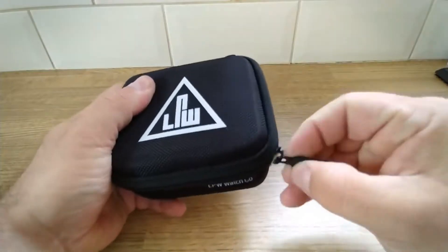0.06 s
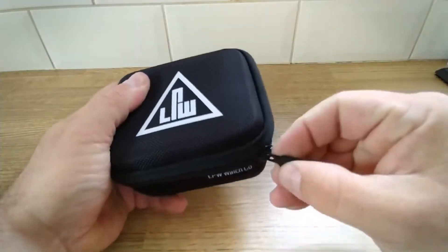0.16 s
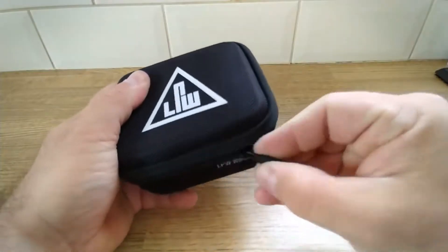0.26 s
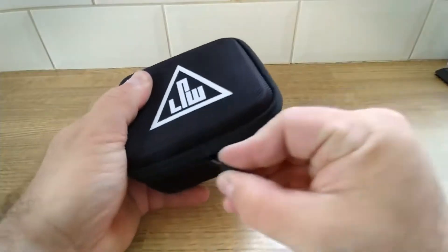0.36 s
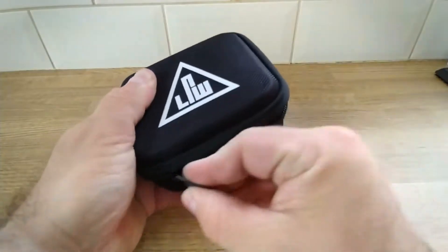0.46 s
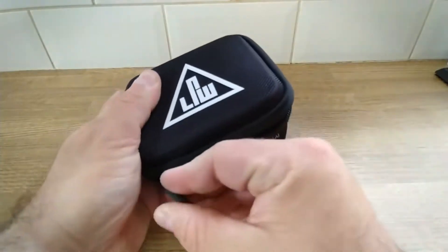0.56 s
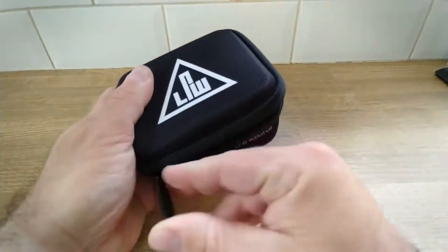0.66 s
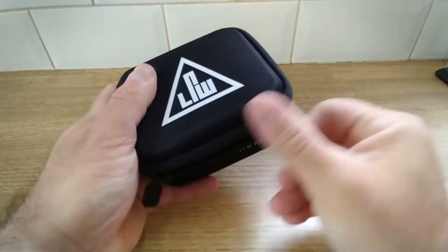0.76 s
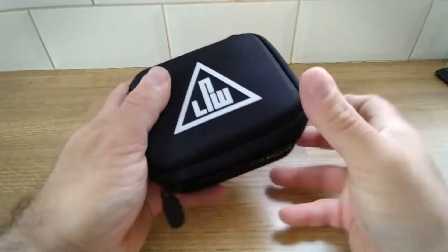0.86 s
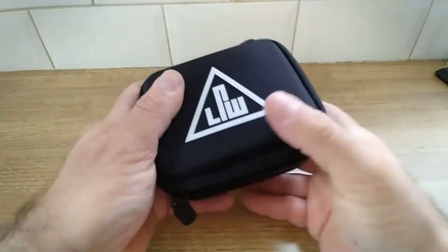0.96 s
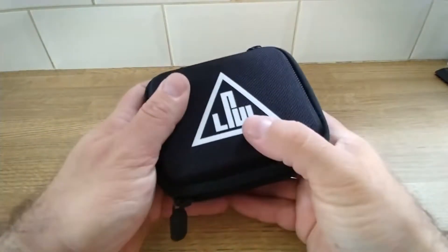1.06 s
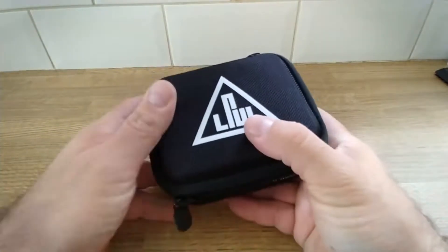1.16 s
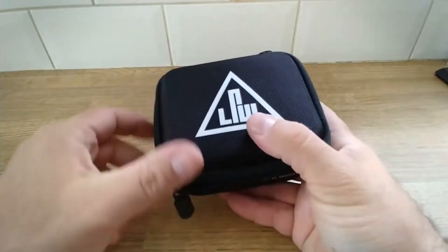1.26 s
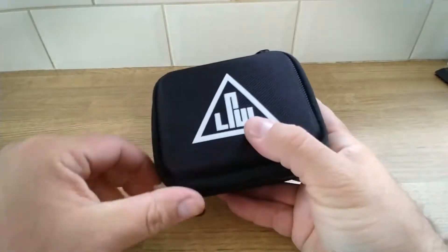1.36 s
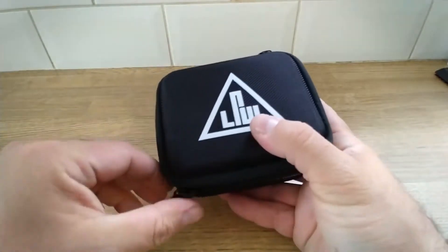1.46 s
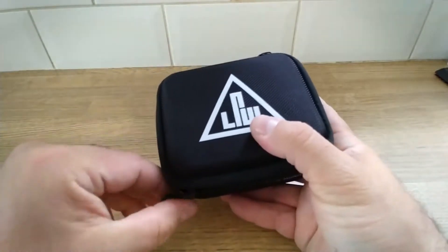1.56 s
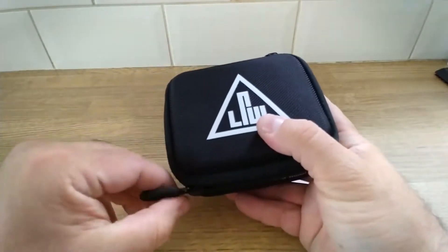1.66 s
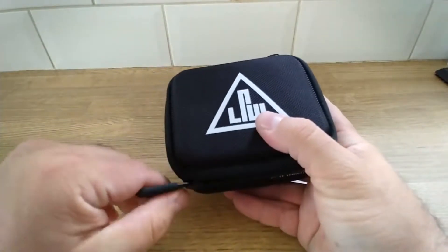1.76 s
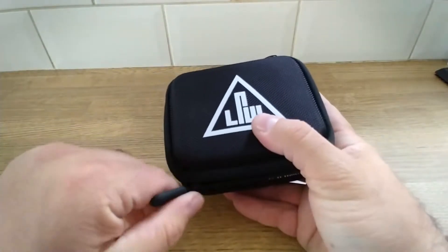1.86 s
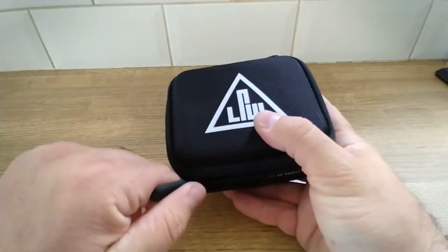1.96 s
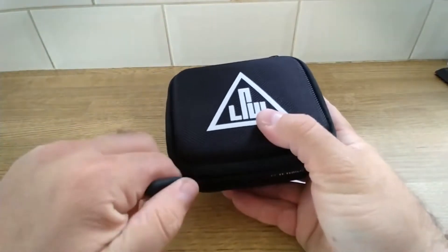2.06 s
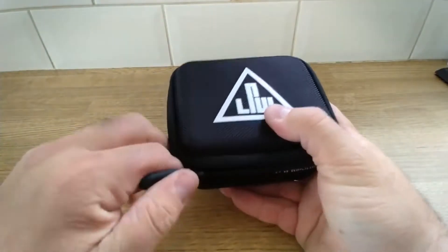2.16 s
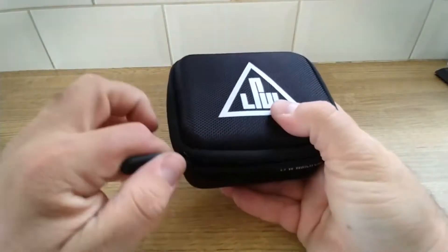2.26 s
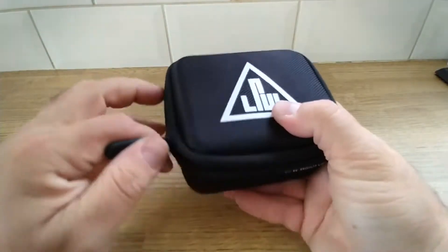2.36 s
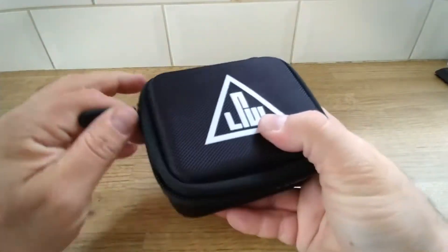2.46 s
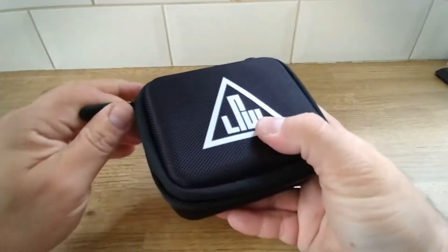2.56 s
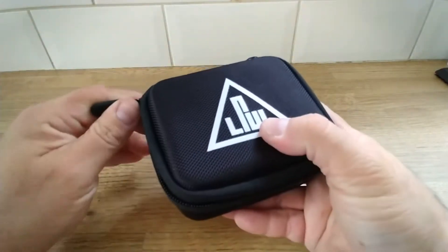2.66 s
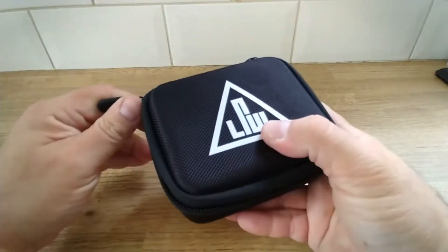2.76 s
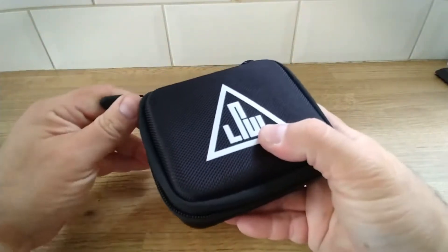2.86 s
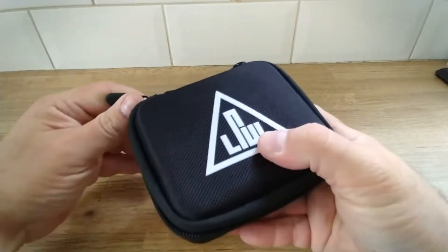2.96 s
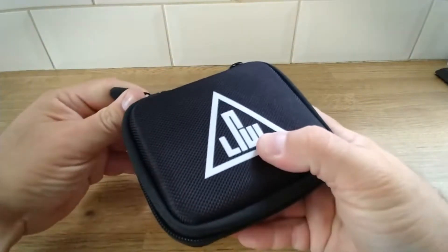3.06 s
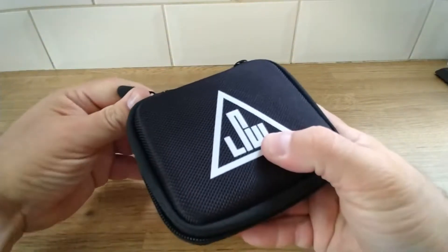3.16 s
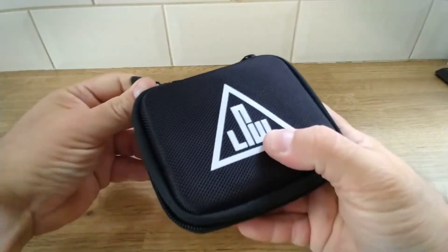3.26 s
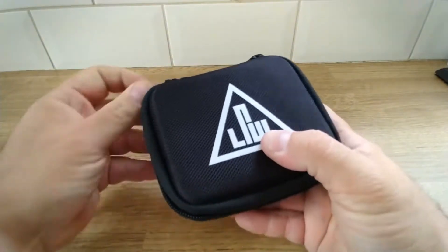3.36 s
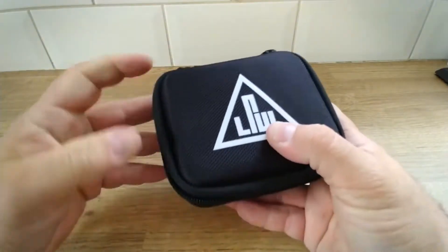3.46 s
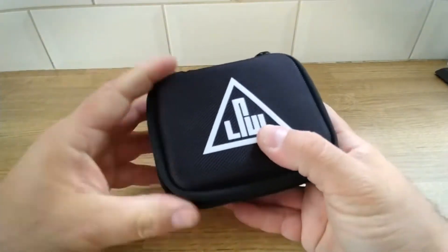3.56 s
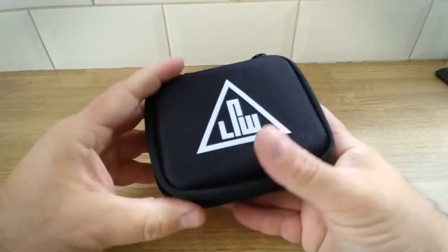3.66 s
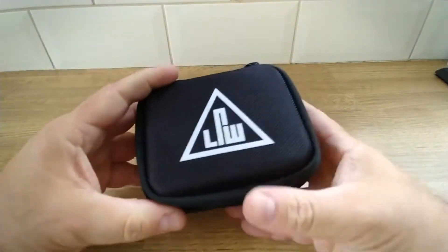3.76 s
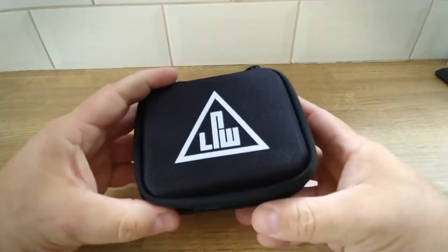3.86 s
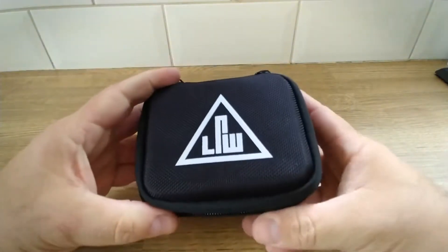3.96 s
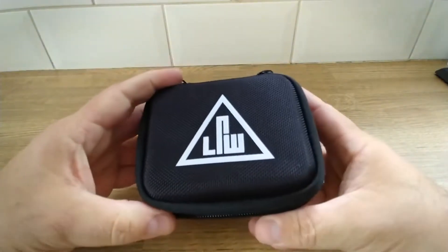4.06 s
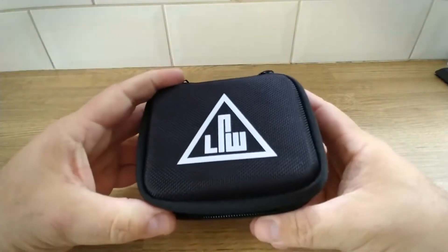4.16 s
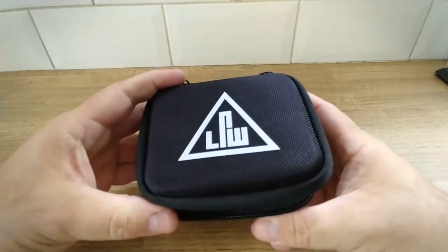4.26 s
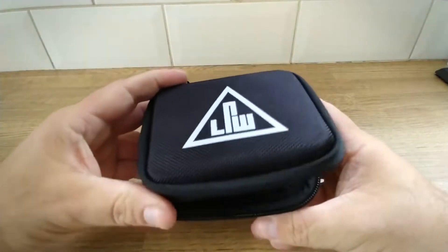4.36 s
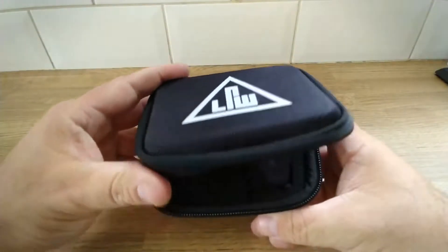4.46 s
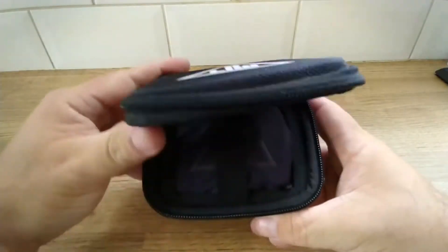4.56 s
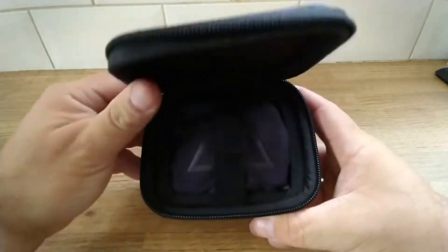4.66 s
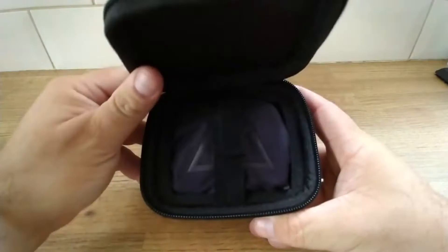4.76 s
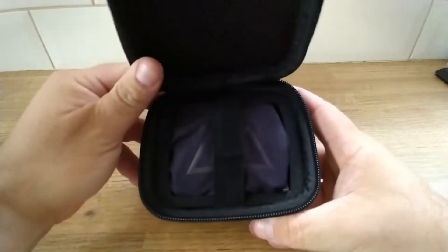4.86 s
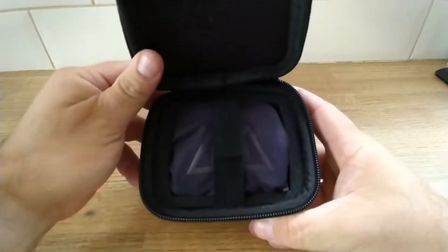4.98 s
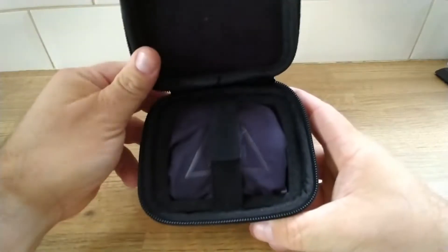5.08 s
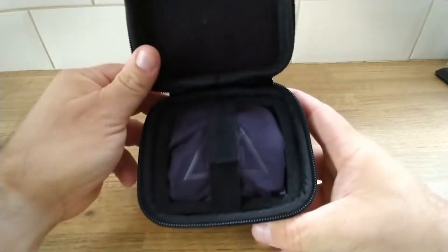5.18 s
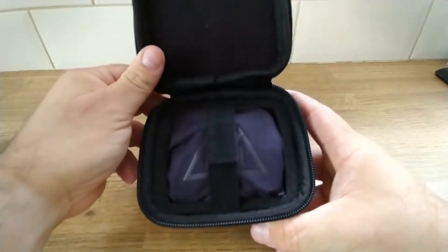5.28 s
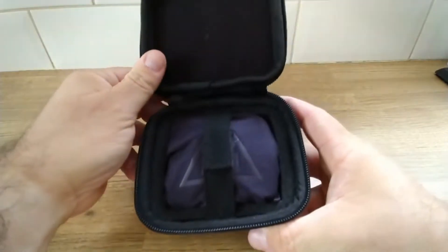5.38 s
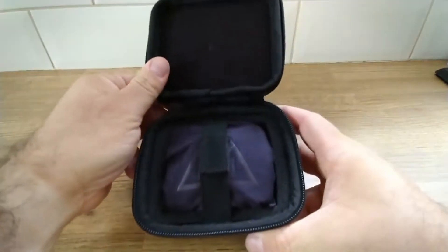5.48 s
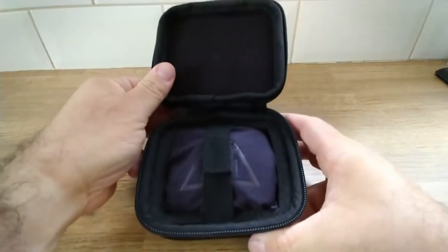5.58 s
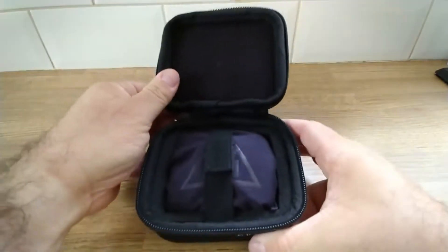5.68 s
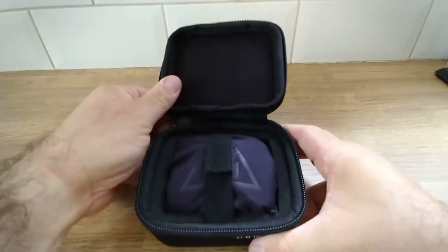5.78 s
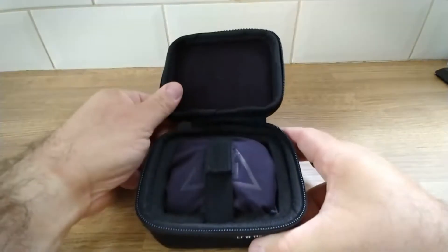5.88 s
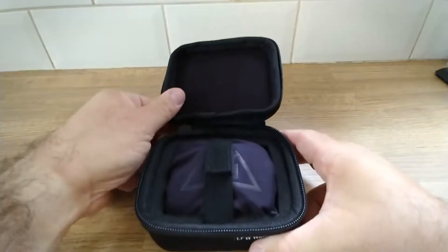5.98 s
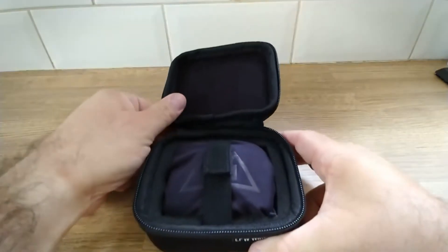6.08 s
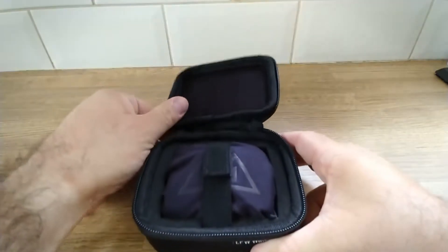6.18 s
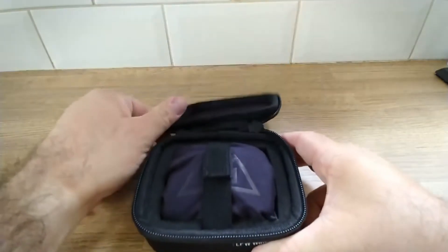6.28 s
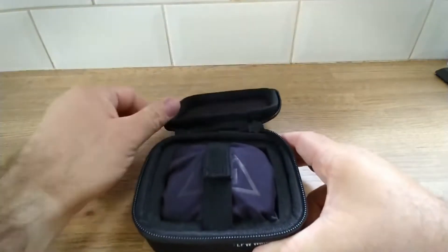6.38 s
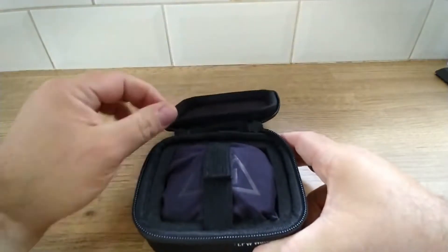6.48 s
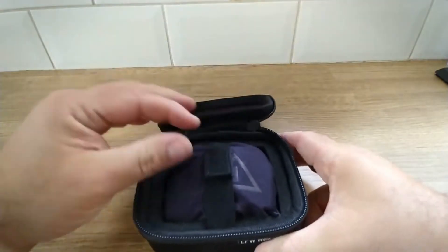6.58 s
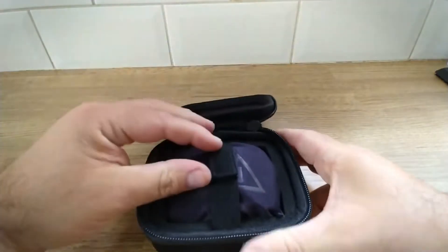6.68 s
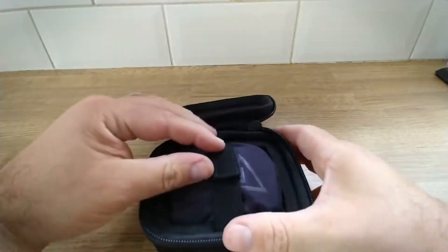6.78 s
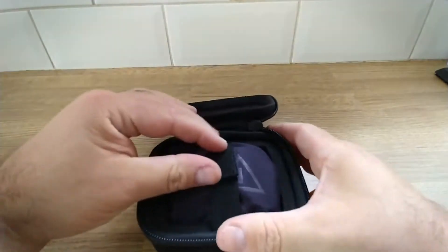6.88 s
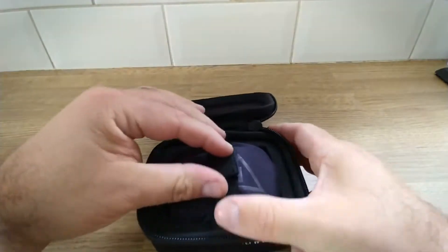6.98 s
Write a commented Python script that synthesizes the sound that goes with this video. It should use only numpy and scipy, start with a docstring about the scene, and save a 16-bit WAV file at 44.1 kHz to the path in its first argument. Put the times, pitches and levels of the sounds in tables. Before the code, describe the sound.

Close, dry handling of a small hard-shell fabric case in a tiled room, with very short reflections and faint room tone. At 0 seconds a tiny zip tick, then from 0.2 to 0.5 a rasping pull swells, its fast teeth giving a hollow mid-pitched buzz. Tab clacks cluster at 0.5 and 0.7, with a bright decaying metallic rattle. A sharp clack at 1.1 leads into scuffs, light taps and skin hiss until 2.2. The second pull, 2.2 to 2.55, speeds up and is brighter. Dull creaks and small catches at 2.6 to 2.8 precede a slower, uneven third pull until 3.0. Knocks and scuffs come around 3.4 and 4.0. The lid lifts near 4.7 with soft low judders. Quiet brushing continues; a rough hinge creak surges at 6.1 to 6.3, ending in a knock. Soft scuffs follow near 6.8 and 7.0.

```python
"""Zip teeth rasp: the first of three pulls that open a small hard-shell fabric case above a wooden table.
Knocks, tab clacks, scuffs, skin hiss and dull creaks surround the pulls; then the lid lifts and its hinge creaks.
Tooth kicks, decaying contact noise and random fibre clicks drive filters for body, shell and surface ticks.
A phone close by hears it in a small tiled room: two coloured ports, short noise echoes, faint room tone."""
import sys
import numpy as np
from scipy import signal
from scipy.fft import rfft, irfft, next_fast_len
from scipy.io import wavfile
from scipy.ndimage import uniform_filter1d

SR = 44100
rng = np.random.default_rng(int(sys.argv[2]) if len(sys.argv) > 2 else 0)


def unload_audio(sound):
    """Save the sound as a 16-bit wav file, at the path given as the first command line argument."""
    columns = np.transpose(np.atleast_2d(sound))
    # keep every value between -1 and 1, then stretch to whole-number steps
    steps = np.round(np.clip(columns, -1, 1) * 32767)
    wavfile.write(sys.argv[1], SR, steps.astype(np.int16))


N = 310023
TIME_S = np.arange(N) / SR

# All levels are relative: the mix, ports and output gain follow.
# Slider pulls: time_s, teeth_per_s, body_db, shell_db, tick_db, body_hz, shell_hz
PULL_FRONT = [(0, 244, -30, -35.5, -55, 520, 1500), (.035, 159, -48, -48, -74, 560, 1600),
              (.075, 66, -53.5, -54.5, -82, 600, 1500), (.2, 50.3, -51, -55, -90, 560, 1500),
              (.215, 103.5, -46.5, -53, -85, 560, 1450), (.24, 118, -37, -42.5, -74.5, 530, 1700),
              (.29, 181, -31, -39, -72, 700, 1650), (.315, 183, -33, -44, -70.5, 600, 1850),
              (.337, 174, -24, -39.5, -69, 520, 1900), (.387, 180, -20.5, -33, -61.5, 520, 1900),
              (.41, 190, -29, -37, -56, 480, 1550), (.43, 128.6, -32, -42.5, -58.5, 298, 1700),
              (.465, 167, -32.5, -41, -62, 560, 1600), (.485, 118, -36, -42, -65.5, 560, 1700),
              (.51, 132, -32.5, -39, -61.5, 520, 2100)]
PULL_SIDE = [(2.185, 69.3, -78, -66, -55.5, 650, 1890), (2.205, 84.4, -38.5, -46, -61, 650, 1980),
             (2.25, 79.8, -39.5, -46, -70.5, 760, 2300), (2.29, 56.73, -43, -44.5, -56, 600, 2310),
             (2.325, 81.4, -40.5, -37.5, -44, 600, 2290), (2.347, 233.9, -37, -38.5, -41, 563, 2250),
             (2.37, 284.6, -27.5, -36, -39, 565, 1950), (2.398, 294.5, -30.5, -31, -47, 600, 1400),
             (2.424, 321.8, -32.5, -33, -40, 334, 1500), (2.46, 271.1, -31, -31.5, -33.5, 267, 2030),
             (2.482, 246.9, -33.5, -40, -47, 676, 1800), (2.51, 229.3, -44.5, -48, -68, 286, 1460),
             (2.54, 212, -41.5, -47.5, -73, 260, 990)]
PULL_CORNER = [(2.88, 30.3, -56, -58, -91, 650, 1400), (2.908, 99.56, -42, -42, -58, 680, 1420),
               (2.945, 112.1, -34.5, -45, -64, 504, 1470), (2.985, 91, -37, -45, -69.5, 490, 1780),
               (3.015, 57, -49, -53.5, -70, 410, 1410)]
# Short knocks and clicks of fingers, tab, slider and lid: start_s, level_db, thump_db, click_db
# (thump_db and click_db relative to level_db)
KNOCKS = [(.065, -63, -8, -2), (.1212, -54, 6.5, -13.5), (.3858, -41.5, 16.5, -14.5), (.4115, -41, 9, -20),
          (.891, -62, -3, -12), (1.187, -55, -8, -21), (1.2797, -49.5, -5, -25), (1.3037, -48.5, 5.5, -28),
          (1.332, -56.5, 2.5, -22), (1.355, -59, 7, -24), (1.387, -64, 12, -20), (1.413, -54.5, 2, -16),
          (1.472, -48.5, 1.5, -6), (1.518, -56, 0, -15), (1.56, -60.5, -1, -14), (1.587, -53, 4, -12),
          (1.7166, -48.5, -1, -25.5), (1.8336, -43.5, -2, -10.5), (1.9586, -52.5, 5.5, -3),
          (1.9964, -51, 2, -3.5), (2.0339, -48.5, -1.5, -4.5), (2.0511, -58, 2, -25),
          (2.1759, -50, 3.5, -20), (2.1953, -42, 4, -13), (2.2008, -42.5, 3.5, -19),
          (2.4992, -46.5, 12.5, -13), (2.8668, -50.5, 3.5, -20), (2.9029, -35.5, -5, -26),
          (3.0517, -61.5, 15.5, -18.5), (3.194, -65, 6.5, -5.5), (3.306, -67.5, 12, -27),
          (3.3552, -42.5, 4.5, -9.5), (3.3865, -51, 19.5, -21), (3.4048, -44.5, 7, -15),
          (3.465, -53, -4, -17), (3.489, -56, -9, -24), (3.529, -55.5, 13, -29), (3.587, -52, 6, -16),
          (3.655, -71.5, 14, -12), (3.699, -65, 7, 3.5), (3.738, -60.5, -4, -19), (3.962, -57, 1, -17),
          (3.992, -52, 0, -16), (4.013, -48, 4.5, -22), (4.0195, -42, -1, -14), (4.185, -67.5, 8, -18),
          (4.205, -61.5, 3.5, -14), (4.257, -67.5, 8, -22), (4.28, -61, -6.5, -24.5), (4.306, -57, -7, -16),
          (4.324, -62.5, 5, -22), (4.4004, -58, -1, -9), (4.415, -54.5, -4, -21), (4.6089, -62, 12, -12),
          (4.795, -63.5, 2, -26), (4.811, -61.5, 5, -18), (5.125, -77.5, 8, -1.5),
          (5.179, -68.5, 0.5, -23.5), (5.373, -64.5, 0.5, 8.5), (6.01, -52, -15, -5.5),
          (6.3035, -38, -7, -21.5), (6.3105, -45.5, -21.5, -17.5), (6.7929, -48.5, -6.5, -33),
          (6.9789, -40.5, -6, -36)]
# Metal pull tab clacking on the slider: start_s, level_db, thump_db, click_db (as above)
CLACKS = [(.5134, -40.5, 6, -13.5), (.5261, -37.5, 0.5, -10.5), (.5478, -40, 3, -8.5),
          (.6924, -50, 1.5, -19), (.7119, -37.5, -4.5, -8), (.7237, -35, -5, -9.5),
          (.7347, -31.5, -4.5, -13.5), (.7378, -30.5, -7.5, -23), (.755, -45, 5.5, -21.5),
          (.833, -49.5, 1, -34), (1.0548, -54, 8, -5), (1.0969, -33.5, -10, -18)]
# Slider catching and giving way near the last corner: start_s, level_db, thump_db, click_db (as above)
CATCHES = [(2.609, -52.5, 9.5, -34), (2.622, -52, 6.5, -29), (2.648, -52, 7.5, -29), (2.694, -58, 11, -8),
           (2.71, -47, 6, -20), (2.74, -52.5, 7.5, -17), (2.773, -50.5, 5, -21), (2.799, -48, 0, -19),
           (2.821, -49, 2.5, -29)]
# Fingers and lid scuffing fabric: peak_s, length_s, level_db, thump_db, hiss_db, body_hz
# (thump_db and hiss_db relative to level_db)
SCUFFS = [(0.571, 0.072, -48.5, -2.5, -25.5, 395), (0.734, 0.059, -40, -3, -26, 653),
          (1.001, 0.037, -56, 2, -3.5, 640), (1.124, 0.08, -50, -4.5, -21, 825),
          (1.298, 0.25, -56, -14, -7, 750), (1.457, 0.12, -58.5, 1, -6.5, 517),
          (1.586, 0.054, -60, 9.5, 0.5, 530), (1.862, 0.03, -47.5, 0.5, -35, 760),
          (1.973, 0.037, -58, 7, -26, 565), (2.201, 0.054, -46.5, 3.5, -2.5, 655),
          (2.569, 0.34, -55.5, 3.5, -32, 320), (3.367, 0.064, -52, 11.5, -23, 585),
          (3.398, 0.099, -45.5, 7.5, -19.5, 290), (3.561, 0.081, -49.5, 4, -17, 505),
          (3.659, 0.15, -67.5, 11.5, 2.5, 493), (3.755, 0.057, -59, -8, -10, 750),
          (3.88, 0.042, -58, 1, -11.5, 640), (3.996, 0.084, -46.5, 2, -19.5, 723),
          (4.016, 0.024, -43.5, 8.5, -14, 747), (4.305, 0.11, -61, 7, -16, 752),
          (4.404, 0.02, -59, 9, -8, 750), (4.547, 0.076, -61, -1, -3.5, 496),
          (4.644, 0.17, -78, 9, -21, 530), (4.802, 0.078, -59, 1.5, -18, 404),
          (5.194, 0.049, -71, -6, -28, 402), (5.4, 0.089, -72.5, 4.5, 2, 550),
          (5.613, 0.057, -69, 2.5, -6, 616), (5.833, 0.039, -61.5, -19, -15, 600),
          (6.333, 0.054, -50, -3, -30, 391), (6.808, 0.059, -48.5, -10.5, -21, 820),
          (6.889, 0.06, -57, -8, -16, 400), (6.979, 0.023, -46.5, 3.5, -19, 820)]
# Skin sliding lightly over the weave: time_s, mids_db, treble_db
BRUSH = [(0, -60, -81), (.88, -61, -70.5), (1.25, -56, -68), (1.419, -63.5, -89), (2.1, -68, -81.5),
         (2.62, -53.5, -69.5), (3.251, -70.5, -84), (3.72, -64.5, -71), (3.821, -67.5, -76),
         (4.851, -68, -78.5), (5.031, -84, -104), (5.381, -64, -75.5), (5.6, -60, -73),
         (5.67, -66.5, -79.5), (5.902, -64, -81.5), (6.199, -57.5, -73), (6.285, -70.5, -81),
         (6.428, -67, -81.5), (6.56, -61.5, -73.5), (7.02, -65.5, -78)]
# Dull creaks of the flexing case: peak_s, length_s, level_db, resonance_hz
FLEXES = [(0.368, 0.03, -55.5, 90), (1.202, 0.7, -61, 130), (2.235, 0.14, -50.5, 122),
          (2.608, 0.13, -44.5, 136), (2.759, 0.18, -51, 141), (2.898, 0.052, -39, 140),
          (2.962, 0.2, -43.5, 105), (3.388, 0.24, -56, 168), (4.848, 0.13, -58.5, 138.5),
          (4.97, 0.34, -73, 121), (5.203, 0.1, -61.5, 125), (5.275, .06, -68.5, 120),
          (5.575, .025, -59, 124.5), (5.617, .06, -69, 125.4), (5.699, 0.053, -70, 125),
          (6.325, 0.069, -53, 155), (6.469, 0.052, -62.5, 119.8), (6.832, 0.054, -53.5, 157),
          (6.894, 0.16, -52.5, 160)]
# Lid juddering on its stiff spine: start_s, length_s, level_db
JUDDERS = [(4.748, .012, -54.5), (4.775, .03, -48.5), (4.81, .012, -42.5), (4.96, .02, -64),
           (5.135, .012, -64), (5.177, .012, -54)]
# Hinge creak while the lid folds back: time_s, level_db
HINGE = [(6.06, -76), (6.125, -59), (6.175, -53), (6.215, -45), (6.236, -50), (6.249, -43.5), (6.264, -46),
         (6.277, -75)]
# Shell resonance, mostly sinking as the case slackens: time_s, resonance_hz
SLACKENING = [(.8, 2050), (2.1, 2120), (2.7, 1525), (4.5, 1520), (6.3, 1245)]

# Body radiation by wall and when tapped: freq_hz, gain_db
BODY_FRONT = [(50, -54.5), (120, -30.5), (200, -21), (290, -2), (430, -9), (525, 3), (620, -8), (710, 1.5),
              (900, -11.5), (1200, -22.5), (2000, -67.5)]
BODY_SIDE = [(110, -28.5), (200, 9.5), (290, 2), (420, -1.5), (560, 3), (720, 7), (900, 6.5), (1100, -54),
             (2000, -43.5)]
BODY_CORNER = [(50, -52.5), (110, -28), (190, -7), (280, 7.5), (360, 3), (500, 5), (620, 5.5), (750, 4),
               (950, -10), (1200, -42.5), (2000, -48.5)]
BODY_TAPPED = [(110, -45.5), (230, -9.5), (400, -8.5), (550, 4), (650, 2.5), (760, 5.5), (950, -11.5),
               (1200, -35.5), (2000, -56)]
# Shell radiation when scuffed, knocked, and under the slider (front, further round): freq_hz, gain_db
SHELL_SCUFFED = [(600, -19.5), (950, 3.5), (1100, -4.5), (1380, 2.5), (1650, -8.5), (1920, 0), (2250, -2.5),
                 (2500, -5), (2900, -9), (3300, -31.5), (4000, -23), (6000, -77.5)]
SHELL_KNOCKED = [(600, -23), (950, 3), (1100, -2.5), (1380, 9), (1650, -6), (1920, 2.5), (2250, -10.5),
                 (2500, -5.5), (2900, -10.5), (3300, -24), (4000, -23), (6000, -42.5)]
SHELL_FRONT = [(600, -11.5), (950, 6.5), (1150, 0.5), (1400, 3), (1700, -2.5), (1950, 0.5), (2300, -8),
               (2600, -12), (2900, -14), (3300, -29.5), (4000, -30), (6000, -56.5)]
SHELL_SIDE = [(600, -14), (950, 4), (1150, -3.5), (1400, 4), (1650, -5), (1950, 1), (2300, -3.5),
              (2600, -5), (2950, -9.5), (3350, -26.5), (4000, -21), (6000, -60.5)]
# Bright surface tick of a contact, and of a tooth: freq_hz, gain_db
TICK = [(2200, -11), (3500, -2.5), (4100, -3), (4600, -7), (5300, -1), (5750, -6.5), (6500, 3), (7400, -5),
        (8600, 2), (9200, 2), (10000, 0.5), (12500, -11.5), (15500, -18.5)]
TOOTH_TICK = [(2200, -14), (3500, -6), (4100, -2), (4600, -7), (5300, -3.5), (5750, -8), (6500, 4.5),
              (7400, -2), (8600, 1.5), (9200, 0.5), (10200, 2), (12500, -11.5), (15500, -18.5)]
# Weave and lid spine under light rubbing: freq_hz, gain_db
WEAVE = [(400, -29), (850, -12.5), (1080, -6), (1320, 2.5), (1620, -5.5), (1860, 3.5), (2200, -3),
         (2900, -3.5), (3350, -11), (4500, -10), (6500, -52)]
# Flexing foam shell: freq_hz, gain_db
FLEX = [(30, -50), (60, -8), (90, -2), (135, -2), (190, -7.5), (260, -3.5), (360, -5.5), (600, -47)]
# Tab and slider ringing in a clack: freq_hz, gain_db
CLACK = [(600, -24.5), (900, -1.5), (1100, 0), (1300, -2.5), (1560, 4.5), (1800, -1.5), (2080, 1.5),
         (2500, -3.5), (2900, -7.5), (3250, -23), (3500, -11), (4100, -19), (4600, -21.5), (6000, -37.5)]
# Released tab ringing: freq_hz, gain_db
TAB = [(900, -16.5), (1400, -10), (1700, 3), (1880, 1), (2100, -0.5), (2350, -5), (2650, -8.5),
       (3400, -18.5), (6000, -38), (10000, -49.5)]
# Hollow boom of the lid: freq_hz, gain_db
LID = [(30, -42.5), (70, -7), (100, -2), (122, -0.5), (155, -1.5), (220, -10), (350, -12), (440, -20),
       (540, -30), (700, -33), (1200, -39), (2500, -70)]
# Creaking spine: freq_hz, gain_db
SPINE = [(500, -45), (950, -27), (1130, -16), (1230, -4), (1320, 3), (1420, -5), (1520, -14), (1650, -26),
         (1850, -13), (1970, -14), (2150, -28), (2550, -24), (3300, -42), (6000, -60)]
# Room tone colour: freq_hz, density_db_per_hz
AIR = [(18, -67.5), (30, -12.5), (147, -1), (216, -4), (524, -7.5), (754, -15.5), (1650, -17.5),
       (3230, -24), (9390, -26.5), (12200, -38.5), (15000, -62)]
# Colour returned by table and tiles: freq_hz, gain_db
ECHO_COLOUR = [(100, -9), (500, -8), (1200, 0), (2200, 1), (4000, 0), (9000, 0), (15000, -3)]
# Phone ports: freq_hz, left_minus_right_db, left_lead_rad, left_direct_share
PORTS = [(60, -3, 0, 1), (130, -1.3, 0, 1), (260, -2.8, .1, 1), (520, -4.3, .3, 1), (800, -6.5, .55, .9),
         (1300, -13.5, -1.8, .45), (2400, -11.5, -1.6, .4), (4400, -2.5, -1.2, .35), (8100, 1, -1.5, .3),
         (14000, 6.5, -1.3, .25)]

# Zip: next tooth caps chatter and tick at these shares of a tooth period
CHATTER_SHARE, TICK_SHARE = .42, .22
TOOTH_TICK_S, STOP_S = .0022, .014  # decay constants
RATTLE, CORNER_RATTLE = .25, .75  # chatter gain in the body's push
BODY_TRAVEL_DB, BODY_TRAVEL_WIDTH_HZ = 4, 160
SHELL_TRAVEL_DB, SHELL_TRAVEL_WIDTH_HZ = 2, 220
# Contact decay constants: body, shell, surface
KNOCK_DECAYS_S = (.0026, .0036, .0024)
CATCH_DECAYS_S = (.0035, .004, .003)
FIRST_PUSH = 4  # against unit-spread noise before crumble gain
PLACE_SPREAD = .04  # log-frequency spread of the struck shell resonance
LIFT_START_S, LIFT_END_S = 4.6, 4.8
WANDER_HZ, WANDER_SPREAD, WANDER_PER_S = 1450, .2, 30  # resonance under a sliding finger
TAB_S, TAB_DB, TAB_T60_S = .738, -37, .41
JUDDER_PER_S = 113
AIR_DB = -73
EARLY_DB, TAIL_DB = -4.5, -15  # echo energy relative to direct
EARLY_DECAY_S = .0018
TOP_HZ = 15400


def amp(db):
    """Decibels to gain."""
    return 10 ** (np.asarray(db) / 20)


def over_hz(hz, values, size):
    """Points joined on a log-frequency axis, read at transform bins."""
    bins_hz = np.arange(size // 2 + 1) * SR / size
    return np.interp(np.log(bins_hz + 1), np.log(hz), values)


def ring(x, spectrum, size=4096):
    """Causal minimum-phase resonator of the given spectrum, unit energy."""
    hz, db = np.transpose(spectrum)
    cepstrum = irfft(np.log(amp(over_hz(hz, db, size))))
    cepstrum[1:size // 2] *= 2
    cepstrum[size // 2 + 1:] = 0
    response = irfft(np.exp(rfft(cepstrum)))[:size // 2]
    return signal.fftconvolve(x, response / np.linalg.norm(response))[:len(x)]


def steady(x, span_s=0.034):
    """Bring running power to one; fine grain stays."""
    size = int(span_s * SR)
    power = uniform_filter1d(uniform_filter1d(x * x, size), size)
    return x / np.sqrt(np.abs(power) + 1e-12)


def add(track, start_s, x):
    """Mix a sound in at a given time."""
    i = max(0, int(start_s * SR))
    track[i:i + len(x)] += x[:max(0, N - i)]


def grains(size, per_s, spread_db, hiss):
    """Fibres catching and letting go: random tiny clicks over fine hiss."""
    sizes = amp(spread_db * np.minimum(rng.exponential(size=size), 4))
    sizes = sizes * rng.choice([-1, 1], size)
    clicks = sizes * (rng.random(size) < per_s / SR)
    return clicks / (clicks.std() + 1e-9) + hiss * rng.standard_normal(size)


def swell(t, length_s, rise, edge_db):
    """Stroke peaking at t = 0; edge_db down at both ends of length_s, rise is the share before the peak."""
    distance = np.maximum(-t / rise, t / (1 - rise)) / length_s
    return amp(-edge_db * distance ** 1.52)


def favour(spectrum, centre_hz, boost_db=7, width=0.17):
    """Contact place lifts one resonance; width is in log frequency."""
    hz, db = np.transpose(spectrum)
    grid = np.linspace(np.log(hz[0]), np.log(hz[-1]), 120)
    bump = np.exp(-.5 * ((grid - np.log(centre_hz)) / width) ** 2)
    return np.column_stack([np.exp(grid), np.interp(grid, np.log(hz), db) + boost_db * bump])


def flutter(per_s):
    """Random levels gliding into one another; spread near one."""
    knots = rng.standard_normal(1024)
    return np.interp(TIME_S * per_s, np.arange(len(knots)), knots)


def shell_pitch(s):
    """Shell resonance in Hz at a moment, as the case slackens."""
    return np.interp(s, *np.transpose(SLACKENING))


def sweep(x, hz, width_hz):
    """Resonance with a movable centre; gain near one at the centre."""
    turn = np.exp(2j * np.pi * np.cumsum(hz) / SR)
    pole = np.exp(-np.pi * width_hz / SR)
    return 2 * (signal.lfilter([1 - pole], [1, -pole], x / turn) * turn).real


def zipper(pull, bodies, shell_spectrum, turn_s, jitter, rough_db, rattle, scrape, chatter_s, drag, first_tooth):
    """Slider wedges teeth apart; each release kicks the case and chatters until the next."""
    s, rate, body_db, shell_db, tick_db, body_hz, shell_hz = np.transpose(pull)
    t = np.arange(s[0], s[-1] + 0.021, 1 / SR)
    speed = np.interp(t, s, rate)
    travel = np.cumsum(speed) / SR
    teeth = np.arange(first_tooth, np.interp(s[-1], t, travel), 1)
    chance = rng.standard_normal((len(teeth), 3))
    at = np.interp(teeth + jitter * chance[:, 0], travel, np.arange(len(t))).astype(int)
    kicks, sharp = np.zeros((2, len(t)))
    kicks[at] = amp(rough_db * chance[:, 1])
    sharp[at] = kicks[at] * amp(2 * chance[:, 2])  # some teeth snap harder

    last = np.maximum.accumulate(np.arange(len(t)) * (kicks > 0))
    since_s = t - t[last]

    def chatter(source, decay_s):
        """Noise decaying after each tooth, over constant tape drag."""
        envelope = source[last] * np.exp(-since_s / decay_s) + drag
        return envelope * rng.standard_normal(len(t)) / np.sqrt(decay_s * SR / 2)

    case_s = np.minimum(chatter_s, CHATTER_SHARE / speed)
    tick_s = np.minimum(TOOTH_TICK_S, TICK_SHARE / speed)
    # Body colour crossfades as the slider reaches the next wall.
    turned = np.clip((t - turn_s) / 0.057 + .5, 0, 1)
    push = kicks + np.interp(turned, (0, 1), rattle) * chatter(kicks, case_s)
    body = ring(push * (1 - turned), bodies[0]) + ring(push * turned, bodies[1])
    shell = ring(kicks + scrape * chatter(kicks, case_s), shell_spectrum)
    tick = ring(0.2 * sharp + chatter(sharp, tick_s), TOOTH_TICK)
    # Place along the track moves one resonance each of body and shell.
    body = body + amp(BODY_TRAVEL_DB) * sweep(body, np.interp(t, s, body_hz), BODY_TRAVEL_WIDTH_HZ)
    shell = shell + amp(SHELL_TRAVEL_DB) * sweep(shell, np.interp(t, s, shell_hz), SHELL_TRAVEL_WIDTH_HZ)
    voices = zip((body, shell, tick), (body_db, shell_db, tick_db))
    mix = sum(steady(voice, 0.011) * amp(np.interp(t, s, db)) for voice, db in voices)
    out = np.zeros(N)
    add(out, s[0], mix * np.exp(-np.maximum(t - s[-1], 0) / STOP_S))
    return out


def brush(shut_db=-5, open_db=-15, shell_db=-3.0, tick_db=-1):
    """Skin slides lightly: fine dry hiss; the hollow body answers less once the lid lifts."""
    s, mids_db, treble_db = np.transpose(BRUSH)
    force = grains(N, per_s=500, spread_db=2.2, hiss=.7)
    hollow_db = np.interp(TIME_S, [LIFT_START_S, LIFT_END_S], [shut_db, open_db])
    weave = ring(force, WEAVE)
    wander_hz = WANDER_HZ * np.exp(WANDER_SPREAD * flutter(WANDER_PER_S))
    weave = weave + sweep(weave, wander_hz, width_hz=320)
    case = amp(shell_db) * steady(weave) + amp(hollow_db) * steady(ring(force, BODY_TAPPED))
    mids = case * amp(np.interp(TIME_S, s, mids_db))
    treble = steady(ring(force, TICK)) * amp(np.interp(TIME_S, s, treble_db) + tick_db)
    pressure = amp(2.06 * flutter(per_s=130))  # uneven finger pressure
    return pressure * (mids + treble)


def air():
    """Faint room tone: noise shared by both ports, and noise each hears alone."""
    shared, left, right = (amp(AIR_DB) * ring(rng.standard_normal(N), AIR) for _ in range(3))
    return 0.76 * shared, 0.57 * np.array([left, right])


def knocks(rows, decays_s, struck_spectrum=None, crumble=0.98, size=2048):
    """Sharp push plus crumbling contact rings body, surface and the shell or another struck part."""
    out, t = np.zeros(N), np.arange(size) / SR
    for s, level_db, thump_db, click_db in rows:
        shell_hz = shell_pitch(s) * np.exp(PLACE_SPREAD * rng.standard_normal())
        struck = struck_spectrum or favour(SHELL_KNOCKED, shell_hz, boost_db=6, width=.3)
        parts = zip((BODY_TAPPED, struck, TICK), decays_s, (thump_db, 0, click_db))
        for spectrum, decay_s, part_db in parts:
            force = crumble * rng.standard_normal(size) * np.exp(-t / decay_s)
            force[0] += FIRST_PUSH
            hit = ring(force, spectrum)
            hit = hit / np.linalg.norm(hit) * np.sqrt(SR * .01)  # energy of unit power over 10 ms
            add(out, s, hit * amp(level_db + part_db))
    return out


def flexes(per_s=90, edge_db=15):
    """Foam shell gives in slow, dull jerks: sparse grains through a favoured wall resonance."""
    out, t = np.zeros(N), np.arange(-.15, .25, 1 / SR)
    for peak_s, length_s, level_db, hz in FLEXES:
        jerks = grains(len(t), per_s, 2.2, hiss=0.62)
        creak = steady(ring(jerks, favour(FLEX, hz)), 0.059)
        add(out, peak_s + t[0], creak * swell(t, length_s, .41, edge_db) * amp(level_db))
    return out


def scuffs(edge_db=13):
    """Firm rubs: the weave catches and slips, its threads shaking the whole case."""
    out, t = np.zeros(N), np.arange(-.15, .25, 1 / SR)
    for peak_s, length_s, level_db, thump_db, hiss_db, body_hz in SCUFFS:
        force = grains(len(t), per_s=330, spread_db=2.4, hiss=.42)
        body = favour(BODY_TAPPED, body_hz, boost_db=14.5)
        shell = favour(SHELL_SCUFFED, shell_pitch(peak_s), boost_db=8.5)
        parts = zip((body, shell, TICK), (thump_db, 0, hiss_db))
        rub = sum(steady(ring(force, spectrum), 0.015) * amp(level_db + part_db) for spectrum, part_db in parts)
        add(out, peak_s + t[0], rub * swell(t, length_s, .47, edge_db))
    return out


def tab(per_s=600):
    """Released pull tab swings and scrapes on the slider: a bright, decaying rattle."""
    out, t = np.zeros(N), np.arange(SR // 2) / SR
    rattle = steady(ring(grains(len(t), per_s, spread_db=4, hiss=1.0), TAB), 0.026)
    add(out, TAB_S, rattle * amp(TAB_DB - 60 * t / TAB_T60_S))
    return out


def judders():
    """Stiff spine sticks and slips in short regular runs; each slip booms in the lid."""
    slips = np.zeros(N)
    for s, length_s, level_db in JUDDERS:
        at = (np.arange(s, s + length_s, 1 / JUDDER_PER_S) * SR).astype(int)
        slips[at] = amp(level_db + rng.standard_normal(len(at))) * np.sqrt(SR / JUDDER_PER_S)
    return ring(slips, LID)


def hinge(per_s=700):
    """Dense, uneven stick-slip rings the spine: a rough creak swelling in surges at steady pitch."""
    s, level_db = np.transpose(HINGE)
    creak = ring(grains(N, per_s, spread_db=3.5, hiss=0.32), SPINE)
    return steady(creak, .007) * amp(np.interp(TIME_S, s, level_db, left=-140, right=-140))


def room(x, t60_s=0.13, size=4096):
    """Table and tiles answer within milliseconds, then the room rings; moving case and hands shift the pattern."""
    t = np.arange(SR // 3) / SR
    x = ring(x, ECHO_COLOUR)
    early = np.exp(-t / EARLY_DECAY_S) * (t > .0006)
    tail = amp(-60 * t / t60_s) * (t > .009)
    early = amp(EARLY_DB) * early / np.linalg.norm(early)
    tail = amp(TAIL_DB) * tail / np.linalg.norm(tail)
    decay = np.hypot(early, tail)
    wet, window = np.zeros((2, N)), np.sqrt(np.hanning(2 * size))
    # Each overlapping piece gets fresh noise echoes at each port.
    for i in range(0, N, size):
        piece = x[i:i + 2 * size]
        for port in wet:
            echoes = decay * rng.standard_normal(len(t))
            add(port, i / SR, signal.fftconvolve(piece * window[:len(piece)], echoes))
    return wet


def ports(direct, diffuse):
    """Ports differ in colour and phase; the shaded left one hears treble mostly by reflection."""
    size = 2 * next_fast_len(N // 2 + 2048, True)
    hz, *columns = np.transpose(PORTS)
    balance_db, lead_rad, share = (over_hz(hz, column, size) for column in columns)
    ratio = amp(balance_db) * np.exp(1j * lead_rad)
    direct, diffuse = rfft(direct, size), rfft(diffuse, size)
    # More reflection makes up for direct energy lost on the left.
    diffuse_gain = np.sqrt(1 + (1 - share ** 2) / amp(EARLY_DB) ** 2)
    left = ratio * (share * direct + diffuse_gain * diffuse[0])
    right = direct + diffuse[1]
    return irfft(2 * np.array([left, right]) / np.abs(1 + ratio), size)[:, :N]


def scene():
    """Three pulls, the handling around them and the lid, in the room."""
    front = zipper(PULL_FRONT, (BODY_FRONT, BODY_CORNER), SHELL_FRONT, turn_s=0.386, jitter=0.032,
                   rough_db=1.0, rattle=(RATTLE, CORNER_RATTLE), scrape=1.4, chatter_s=.004,
                   drag=.1, first_tooth=.5)
    side = zipper(PULL_SIDE, (BODY_TAPPED, BODY_SIDE), SHELL_SIDE, turn_s=2.35, jitter=0.04,
                  rough_db=2, rattle=(RATTLE, RATTLE), scrape=1.0, chatter_s=0.006,
                  drag=.035, first_tooth=.58)
    corner = zipper(PULL_CORNER, (BODY_TAPPED, BODY_CORNER), SHELL_SIDE, turn_s=2.94, jitter=0.21,
                    rough_db=1.5, rattle=(CORNER_RATTLE, CORNER_RATTLE), scrape=1.0, chatter_s=0.007,
                    drag=.05, first_tooth=.65)
    short_knocks = knocks(KNOCKS, KNOCK_DECAYS_S)
    clacks = knocks(CLACKS, KNOCK_DECAYS_S, CLACK)
    catches = knocks(CATCHES, CATCH_DECAYS_S)
    pulls = front + side + corner
    handling = brush() + short_knocks + flexes() + clacks + scuffs() + tab() + catches
    case = pulls + handling + judders() + hinge()
    shared, apart = air()
    return ports(case + shared, room(case) + apart) * amp(-1.3)


def record(dry):
    """Phone cuts the top: steep elliptic low-pass."""
    return signal.sosfilt(signal.ellip(8, .2, 70, TOP_HZ, fs=SR, output="sos"), dry)


dry = scene()
out = record(dry)
unload_audio(out)
```